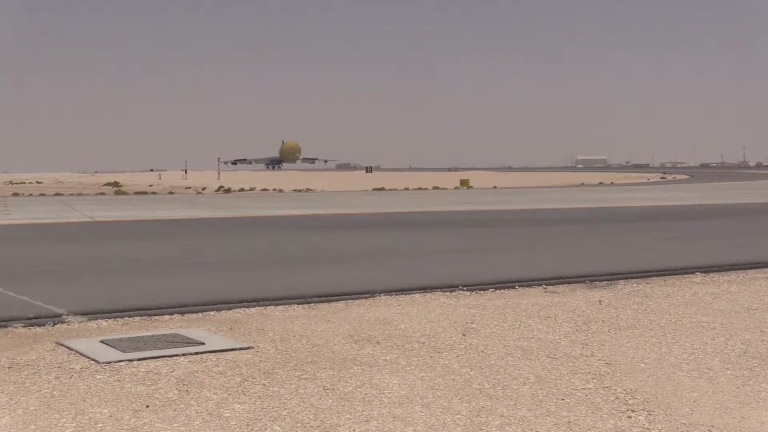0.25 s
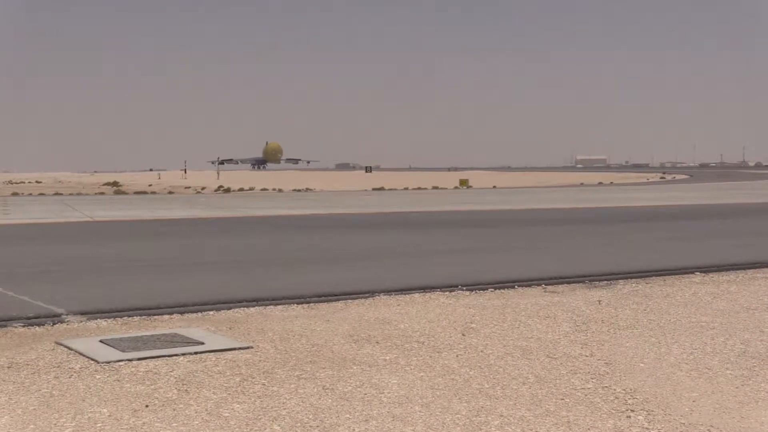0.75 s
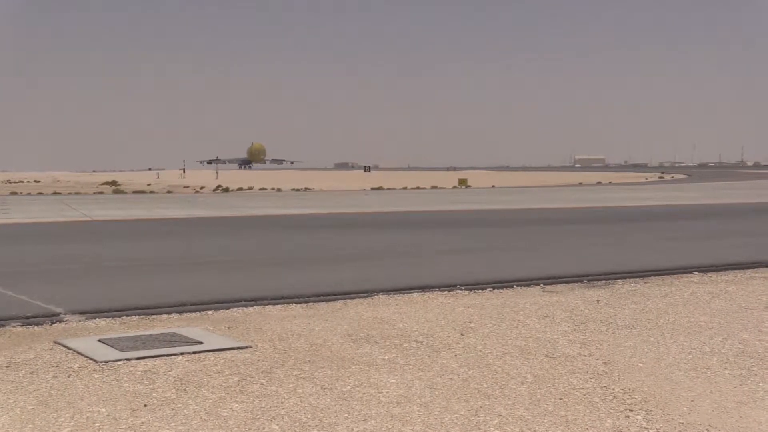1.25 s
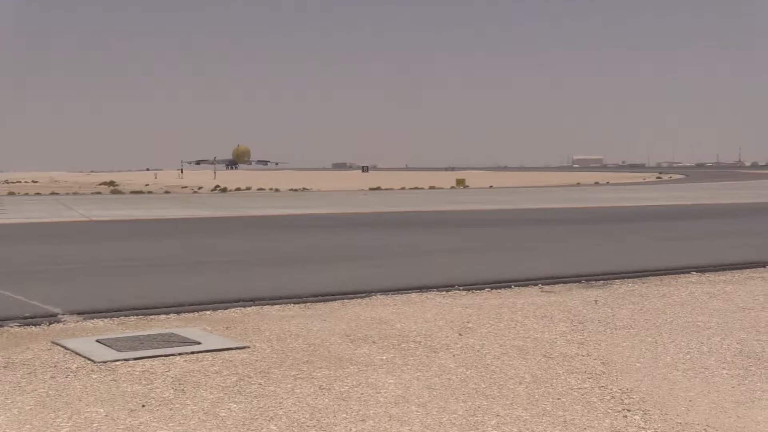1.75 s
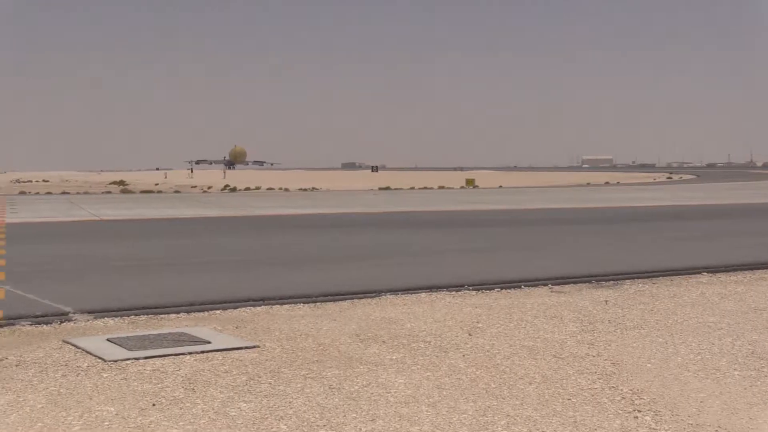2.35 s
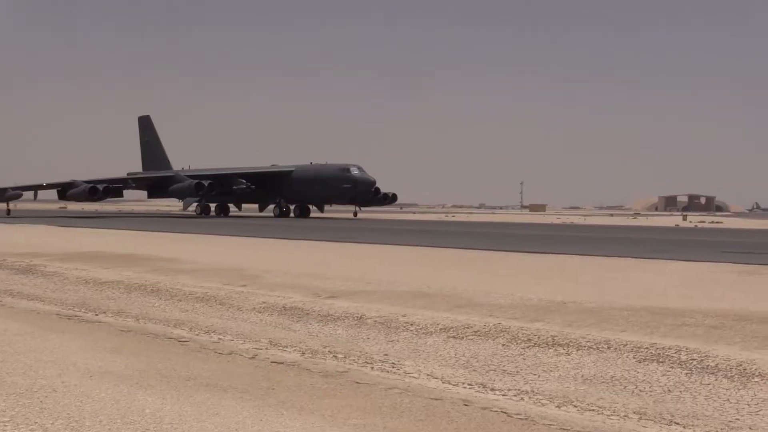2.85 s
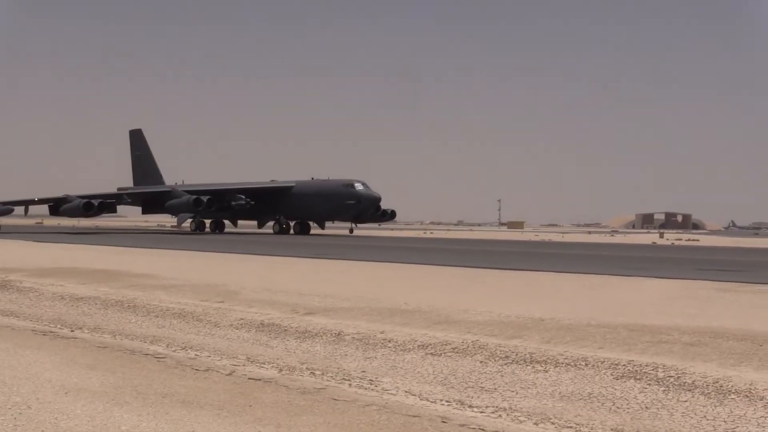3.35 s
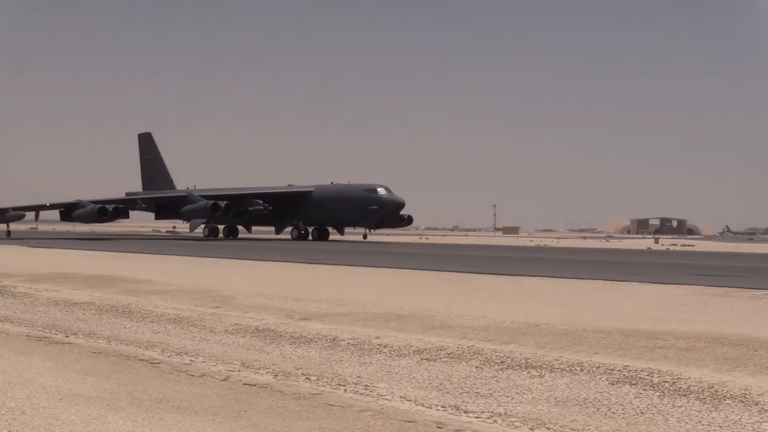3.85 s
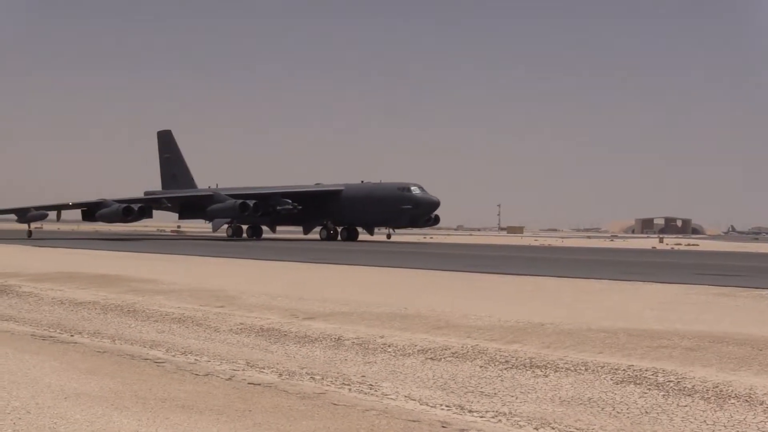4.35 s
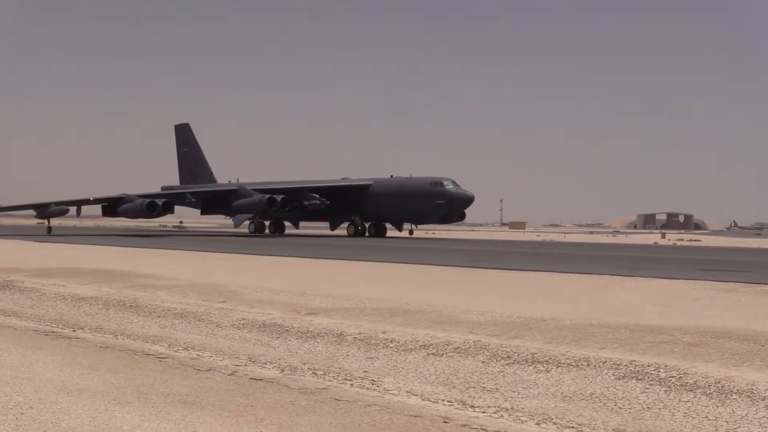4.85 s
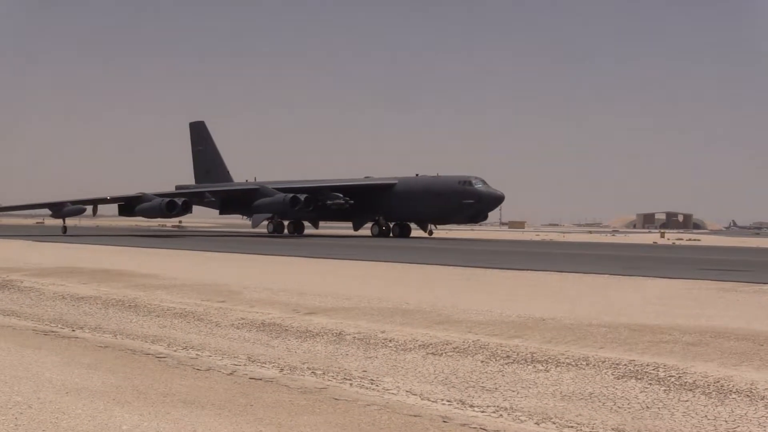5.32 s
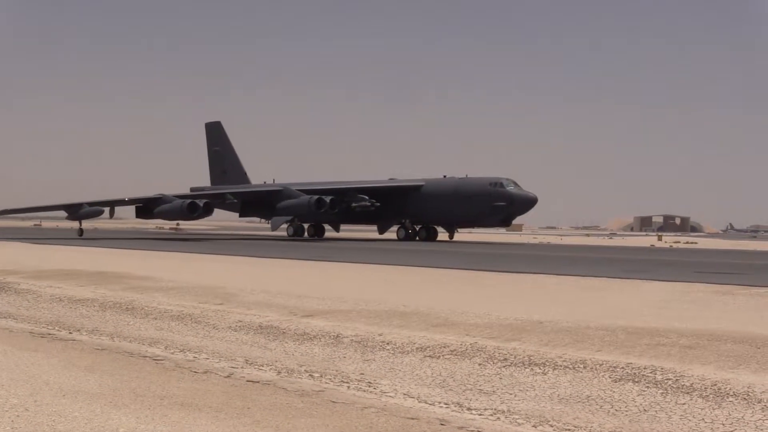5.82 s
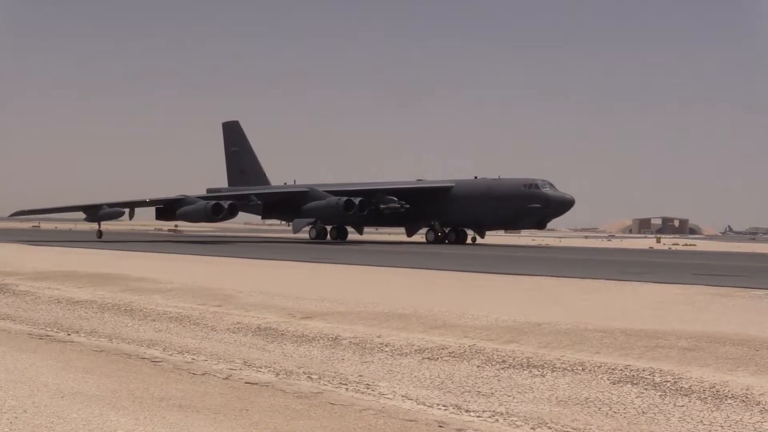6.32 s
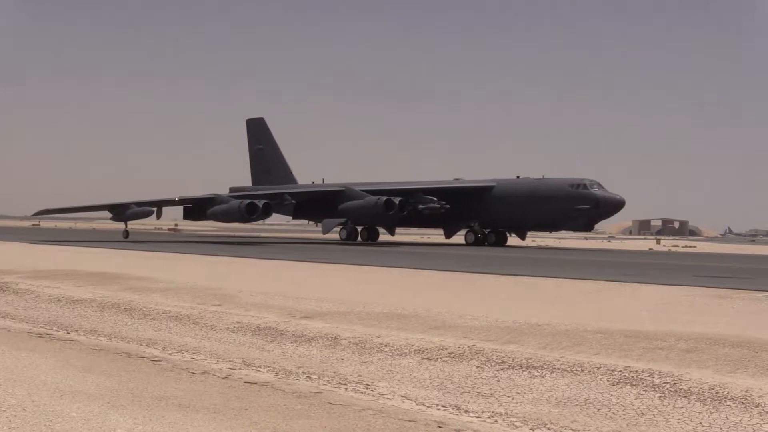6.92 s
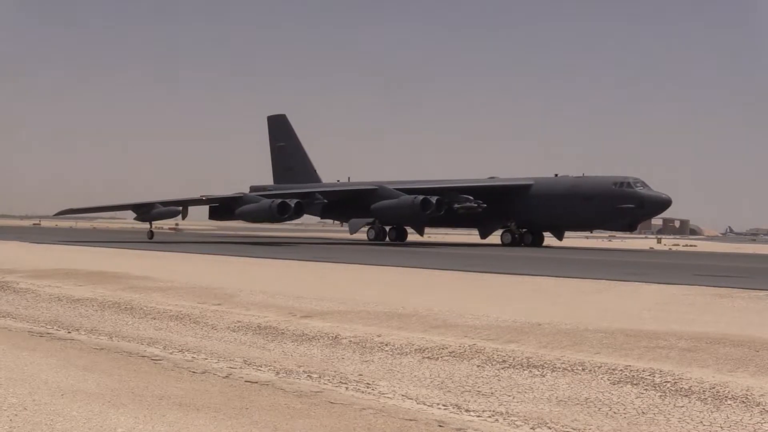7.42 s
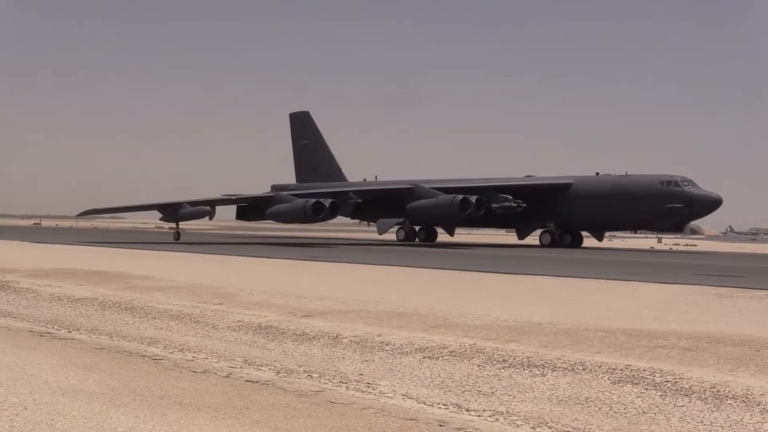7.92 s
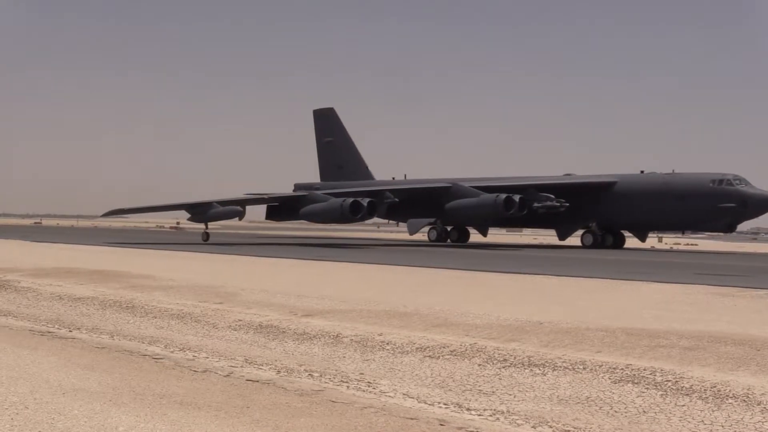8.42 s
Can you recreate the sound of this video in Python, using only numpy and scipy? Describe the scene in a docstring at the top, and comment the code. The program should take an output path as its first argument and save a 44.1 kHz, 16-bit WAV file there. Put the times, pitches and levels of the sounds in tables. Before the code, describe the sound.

A jet aircraft rumbles and whines in the distance, then is suddenly close, taxiing by with a loud throbbing whine and rushing hiss.

```python
"""A jet bomber taxis on a desert airfield. First it is far off: dull exhaust rumble under the thin whine
of idling fans, slowly fading. At 0.8 s, a faint dry ticking nearby. At 2.7 s the place changes abruptly
and the aircraft rolls close by: each fan turns at its own speed, so the blade tones beat over the
brightening rush of intakes and exhausts. Near 7.1 s the fans fall in step and the whine surges."""
import sys
import numpy as np
from scipy import signal
from scipy.fft import irfft
from scipy.io import wavfile
from scipy.ndimage import uniform_filter1d

SR = 44100
rng = np.random.default_rng(int(sys.argv[2]) if len(sys.argv) > 2 else 0)


def store_wav(level_fs):
    """Save 16-bit WAV to argv[1]."""
    pcm = np.round(np.clip(np.atleast_2d(level_fs), -1, 1) * 32767)
    wavfile.write(sys.argv[1], SR, pcm.T.astype(np.int16))


N = 382788
TIME_S = np.arange(N) / SR
NEAR_START_S, IN_STEP_S = 2.667, 7.089
NEAR_MID_S = (NEAR_START_S + TIME_S[-1]) / 2

# Table levels are relative; the functions add their own gains.
# Far jet noise: freq_hz, density_db
FAR_SPECTRUM = [(25, -91), (45, -78.5), (75, -65), (130, -66), (250, -74), (400, -80), (570, -80.5),
                (750, -86), (1500, -89.5), (2500, -98.5), (3500, -101.5), (5000, -117.4), (7000, -125.4),
                (14500, -139.3)]
# Its humps and one dip: centre_hz, width_hz, height_db
FAR_BANDS = [(962, 50, 11), (1943, 85, 8), (2870, 146, 5), (3360, 31, -5)]
# Far fade: rumble_db_per_s, roar_db_per_s, hiss_db_per_s
FAR_FADES = (2, 1.57, 3)
# Idling fans: pitch_hz, level_db
IDLE_TONES = [(565, -67.5), (922, -67.5), (953, -56.5), (991, -76), (998, -56), (1013, -63)]
# Repeated tick figure: offset_s, level_db
TICKS = [(0, -72), (.015, -72), (.036, -70), (.065, -68)]
# Near jet noise: freq_hz, density_db
NEAR_SPECTRUM = [(25, -87.5), (50, -77.5), (100, -61), (200, -67), (300, -64.5), (420, -70), (520, -65),
                 (750, -66), (1500, -63.5), (3000, -67.5), (3800, -72.5), (5000, -75.5), (6000, -81),
                 (7200, -83), (10000, -97), (14500, -121)]
# Blades chopping turbulence: centre_hz, width_hz, height_db
BLADE_BANDS = [(1122, 115, 9.5), (2175, 103, 4.5), (3330, 120, 4.5), (4480, 130, 4), (5420, 163, 3),
               (6660, 190, 3)]
# Near midrange: time_s, unscaled_level_db
ROAR_CURVE = [(2.72, -39), (3.1, -39), (3.18, -36.5), (4.89, -39), (5.0, -38), (6.02, -40), (8.62, -37.5)]
# Near treble: time_s, level_db
HISS_CURVE = [(2.72, -57), (2.83, -60), (3.06, -54), (6.05, -53.5), (6.14, -54.5), (7.67, -48.5),
              (8.08, -52), (8.62, -46.5)]
# Low gusts: centre_s, gain_db
GUSTS = [(4.62, 4), (4.95, 3.6), (6.08, 2.5)]
# Blade-passing pitch, sagging as the aircraft comes abreast. fan: base_hz, sag_hz_per_s, extra_hz, settle_s
FAN_PITCHES = {"A": (1125.30, 1.364, 16.867, 1.604), "B": (1117.906, .362, 4.823, 2.608),
               "C": (1120.066, 2.121, 7.638, .93), "D": (1081, 1.5, 15.5, 1.4), "E": (1075, .3, 1, 1),
               "F": (1071, 3.3, 1, 1)}
# Fan strength. fan: main_db, overtone_db
FAN_GAINS = {"A": (.2, 0), "B": (-1.2, 0.41), "C": (-.2, -0.61), "D": (-9.5, 0), "E": (-8.5, -5.5),
             "F": (-12, -9.5)}
# Tones of each fan ("inner": a deeper blade row). partial: pitch_ratio, level_db
BLADE_PARTIALS = {"main": (1, -29.5), "inner": (1.593, -48.5), "2nd": (2, -45.5), "3rd": (3, -49.5),
                  "4th": (4, -53.3), "5th": (5, -60.5), "6th": (6, -65.5), "7th": (7, -74), "8th": (8, -80)}
# Intake beams and gaps sweeping past: centre_s, fan, partial, half_width_s, gain_db
INTAKE_BEAMS = [(3.1, "C", "main", 1.0, -12), (3.1, "D", "main", 1.2, 9.5), (3.4, "E", "main", .9, 4),
                (6.45, "B", "main", 0.3, -7), (2.997, "A", "3rd", 0.87, 11), (3.3, "E", "4th", 0.69, 16),
                (3.5, "B", "3rd", 0.33, 12.5), (4.103, "B", "3rd", 0.19, 13.5),
                (3.502, "D", "2nd", 0.34, 9.5), (4.65, "A", "inner", 0.75, 9), (4.75, "D", "2nd", .4, 9.5),
                (5.887, "B", "4th", 0.35, 10.5), (7.2, "D", "4th", 0.64, 9), (8.4, "C", "2nd", 0.72, 9.5)]
# Compressor whistle: time_s, pitch_hz, level_db
WHISTLE_CURVE = [(2.67, 3030, -42), (4.2, 3042, -57), (5.5, 2996, -46.5), (7.0, 3032, -43.5),
                 (8.68, 3040, -62)]


def gain_of(db):
    """Decibels to amplitude."""
    return 10 ** (np.asarray(db) / 20)


def unit_rms(x):
    """Scale to rms 1."""
    return x / np.sqrt(np.mean(abs(x) ** 2) + 1e-20)


def follow(curve):
    """A curve's value columns, interpolated per sample."""
    time_s, *columns = np.transpose(curve)
    return [np.interp(TIME_S, time_s, column) for column in columns]


def swell(centre_s, half_width_s):
    """Gaussian bump of height 1."""
    return np.exp(-((TIME_S - centre_s) / half_width_s) ** 2)


def drift(rate_hz, bins=2000):
    """Smooth random motion up to about rate_hz, rms 1."""
    hz = np.fft.rfftfreq(N, 1 / SR)[:bins]
    spectrum = (rng.standard_normal(bins) + 1j * rng.standard_normal(bins)) / (1 + (hz / rate_hz) ** 2)
    slow = unit_rms(irfft(spectrum, 4 * bins))
    return np.interp(np.arange(N), np.linspace(0, N, len(slow)), slow)


def jet_noise(spectrum, bands, levels_db, hiss_hz, patch_db, gust_db):
    """Noise mottled by turbulence; levels_db moves rumble, roar and hiss about their means."""
    frame_s = np.arange(N // 512 + 3) * 512 / SR
    hz = np.fft.rfftfreq(2048, 1 / SR)
    freq_hz, density_db = np.transpose(spectrum)
    db = np.interp(np.log(hz + 1), np.log(freq_hz), density_db)
    db = db + sum(height * np.exp(-.5 * ((hz - centre) / width) ** 2) for centre, width, height in bands)
    rumble_db, roar_db, hiss_db = (np.interp(frame_s, TIME_S, c - c.mean())[:, None] for c in levels_db)
    low = 1 / (1 + (hz / 250) ** 4)
    high = np.clip((hz - 1500) / (hiss_hz - 1500), 0, 2)  # air absorbs treble most
    db = db + low * rumble_db + (1 - low) * (roar_db + high * (hiss_db - roar_db))
    real, imag, patches = rng.standard_normal((3, len(frame_s), len(hz)))
    patches = uniform_filter1d(patches, size=7, axis=0)
    patches = unit_rms(uniform_filter1d(patches, size=12, axis=1))
    frames = (real + 1j * imag) * gain_of(db + patch_db * patches)
    noise = signal.istft(frames.T, SR, nperseg=2048, noverlap=1536, scaling="psd")[1][:N]
    return noise * gain_of(gust_db * drift(rate_hz=14))


def far_levels_db():
    """Steady fades of the far rumble, roar and hiss."""
    return [rate * (NEAR_START_S / 2 - np.minimum(TIME_S, NEAR_START_S)) for rate in FAR_FADES]


def far_rush(cutoff_hz=5100):
    """Distant jet noise; the long path takes the top treble."""
    noise = jet_noise(FAR_SPECTRUM, FAR_BANDS, far_levels_db(), hiss_hz=4300, patch_db=.4, gust_db=.24)
    return signal.sosfilt(signal.butter(4, cutoff_hz, fs=SR, output="sos"), gain_of(-2.5) * noise)


def blade_tone(pitch_hz, level_db, flicker_db, smear_rad, in_step=False):
    """A tone through hot, moving air, which shakes its level and phase."""
    cycles = np.cumsum(pitch_hz * np.ones(N)) / SR
    cycles -= np.interp(IN_STEP_S, TIME_S, cycles) if in_step else rng.random()
    amplitude = np.sqrt(2) * gain_of(level_db + flicker_db * drift(rate_hz=6.2))
    return amplitude * np.sin(2 * np.pi * cycles + smear_rad * drift(rate_hz=4.7))


def far_whine(gain_db=-3):
    """Idling fans, blurred by the long path over hot ground, fading with the roar."""
    fade_db = far_levels_db()[1]
    return sum(blade_tone(hz, db + gain_db + fade_db, flicker_db=3.5, smear_rad=1)
               for hz, db in IDLE_TONES)


def ticking(start_s=.775, period_s=.108, repeats=4, rise_s=.005, gain_db=-9, grit_db=5):
    """Tiny scratchy treble bursts, each a clump of uneven clicks."""
    ticks = [(start_s + k * period_s + offset_s, db) for k in range(repeats) for offset_s, db in TICKS]
    peak_s, level_db = np.transpose(ticks)
    age = np.maximum(TIME_S[:2 * SR] - peak_s[:, None] + rise_s, 0) / rise_s
    bursts = (gain_of(level_db + gain_db)[:, None] * age * np.exp(1 - age)).sum(0)
    grit = rng.standard_normal(N) * gain_of(grit_db * rng.standard_normal(N))
    fizz = signal.sosfilt(signal.butter(2, [4500, 8000], "bandpass", fs=SR, output="sos"), grit)
    return unit_rms(fizz) * np.pad(bursts, (0, N - len(bursts)))


def near_rush(rise_db=2.5, rise_s=.8, roar_scale=.67):
    """Close intakes and exhausts: the rumble builds and gusts, the hiss brightens."""
    rumble_db = -rise_db * np.exp(-np.maximum(TIME_S - NEAR_START_S, 0) / rise_s)
    rumble_db += sum(db * swell(centre_s, half_width_s=.05) for centre_s, db in GUSTS)
    levels_db = rumble_db, roar_scale * follow(ROAR_CURVE)[0], follow(HISS_CURVE)[0]
    noise = jet_noise(NEAR_SPECTRUM, BLADE_BANDS, levels_db, hiss_hz=8500, patch_db=1.04, gust_db=.08)
    return gain_of(-.77) * noise


def fan_tone(fan, partial, gain_db, flicker_db, smear_rad):
    """One sagging partial of one fan, louder in its beams, softer in its gaps."""
    base_hz, sag_hz_per_s, extra_hz, settle_s = FAN_PITCHES[fan]
    ratio, partial_db = BLADE_PARTIALS[partial]
    age_s = np.maximum(TIME_S - NEAR_START_S, 0)
    blade_hz = base_hz - sag_hz_per_s * age_s + extra_hz * np.exp(-age_s / settle_s)
    beam_db = sum(db * swell(centre_s, half_width_s)
                  for centre_s, f, p, half_width_s, db in INTAKE_BEAMS if (f, p) == (fan, partial))
    level_db = gain_db + partial_db + beam_db
    return blade_tone(ratio * blade_hz, level_db, flicker_db, smear_rad, in_step=partial == "main")


def near_whine(gain_db=-1.43, approach_db_per_s=.75):
    """Three fans close in pitch throb; three slower ones add a quick flutter."""
    db = gain_db + approach_db_per_s * (TIME_S - NEAR_MID_S)
    return sum(fan_tone(fan, "main", db + main_db, flicker_db=1, smear_rad=.22)
               for fan, (main_db, _) in FAN_GAINS.items())


def compressor_whistle():
    """A thin tone near 3 kHz that comes and goes."""
    return blade_tone(*follow(WHISTLE_CURVE), flicker_db=0, smear_rad=.42)


def fan_overtones(gain_db=-.15, lobe_db=3, lobe_hz=.8):
    """Higher blade tones, wavering as weak beams pass; the highest grow on approach."""
    out = np.zeros(N)
    for partial, (ratio, _) in list(BLADE_PARTIALS.items())[1:]:
        approach_db_per_s = np.log(ratio / 2)
        trend_db = gain_db + approach_db_per_s * (TIME_S - NEAR_MID_S)
        for fan, (_, overtone_db) in FAN_GAINS.items():
            db = trend_db + overtone_db + lobe_db * drift(lobe_hz)
            out += fan_tone(fan, partial, db, flicker_db=2.5, smear_rad=.35)
    return out


def scene(crossfade_s=.001):
    """The distant aircraft, then at once the close one."""
    far = far_rush() + far_whine() + ticking()
    near = near_rush() + near_whine() + compressor_whistle() + fan_overtones()
    near_share = np.clip((TIME_S - NEAR_START_S) / crossfade_s, 0, 1)
    return ((1 - near_share) * far + near_share * near)[None]


def record(dry, hiss_gain_db=-89.5, hiss_cutoff_hz=12000, cutoff_hz=14900):
    """Faint self-noise, then a steep band limit."""
    hiss = signal.sosfilt(signal.butter(6, hiss_cutoff_hz, fs=SR, output="sos"),
                          rng.standard_normal(dry.shape))
    lowpass = signal.firwin(511, cutoff_hz, window=("kaiser", 9), fs=SR)
    return signal.oaconvolve(dry + gain_of(hiss_gain_db) * hiss, lowpass[None], "same")


dry = scene()
out = record(dry)
store_wav(out)
```